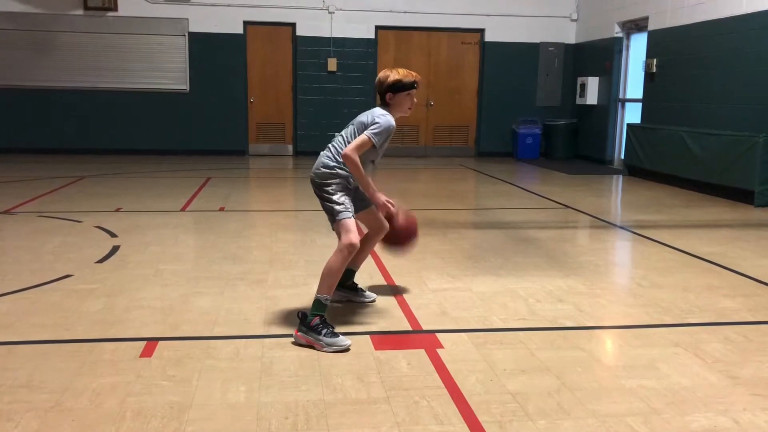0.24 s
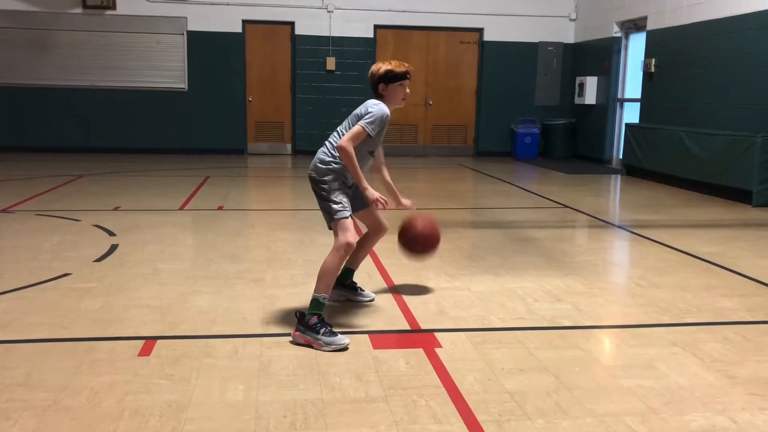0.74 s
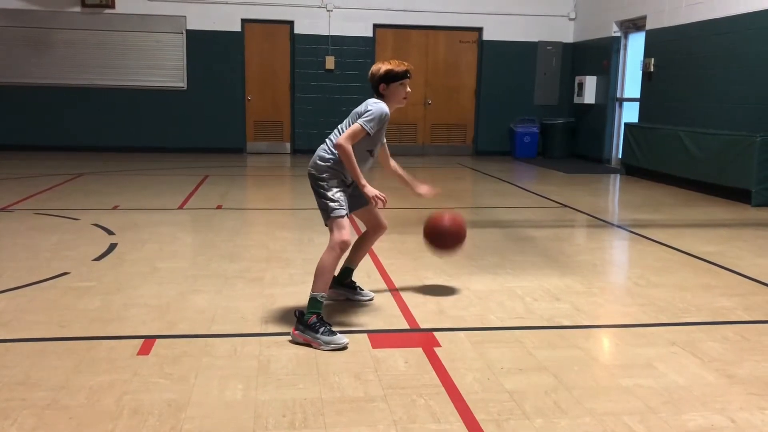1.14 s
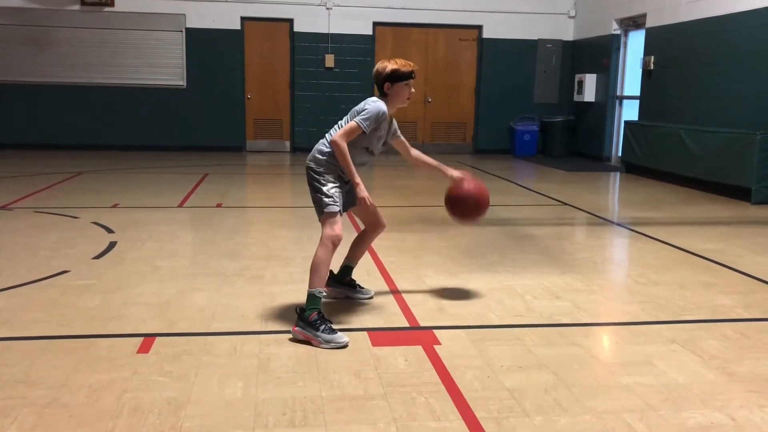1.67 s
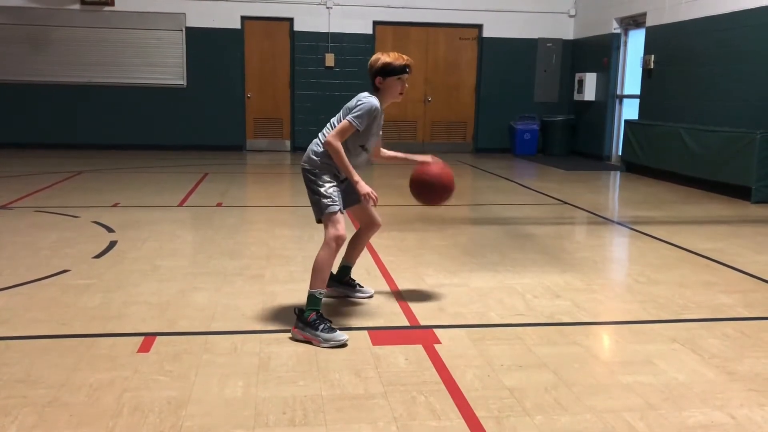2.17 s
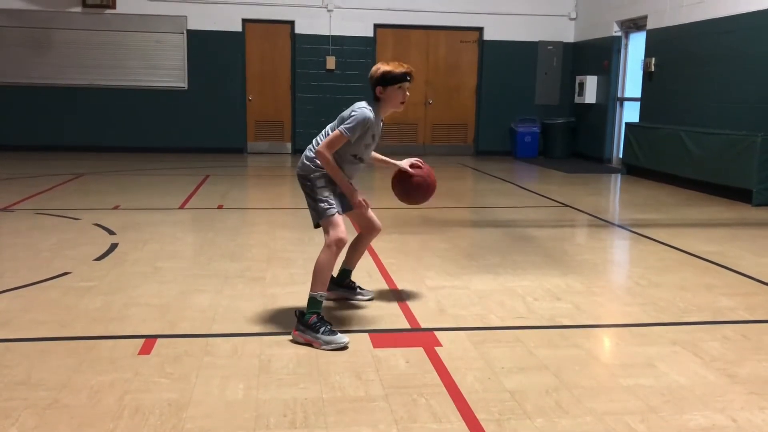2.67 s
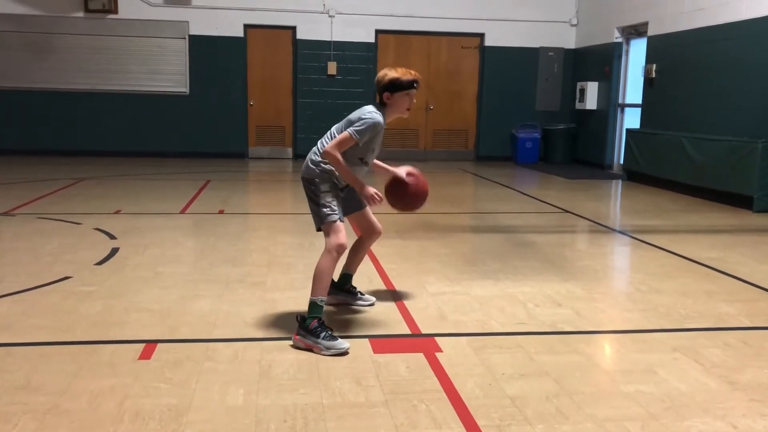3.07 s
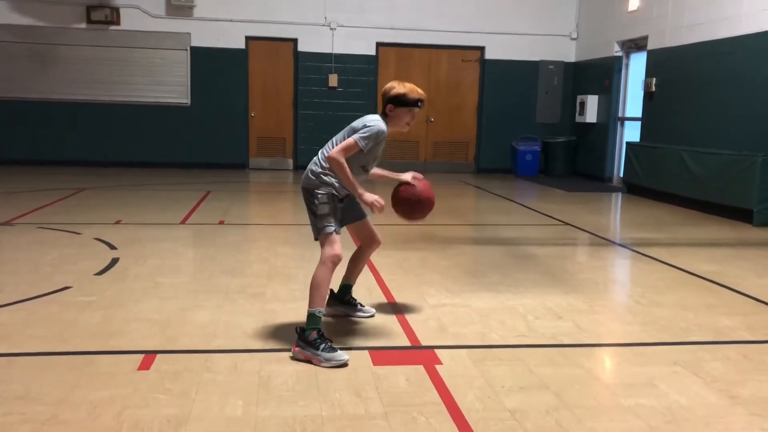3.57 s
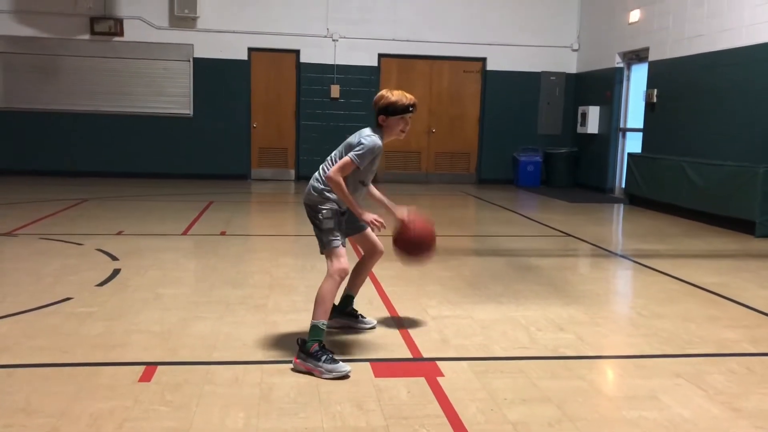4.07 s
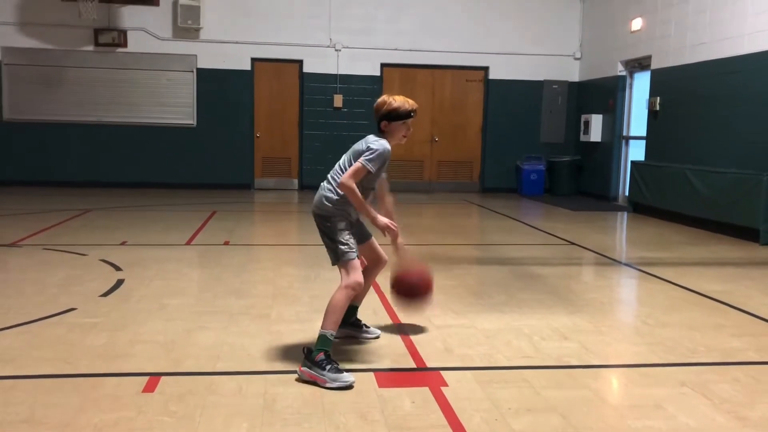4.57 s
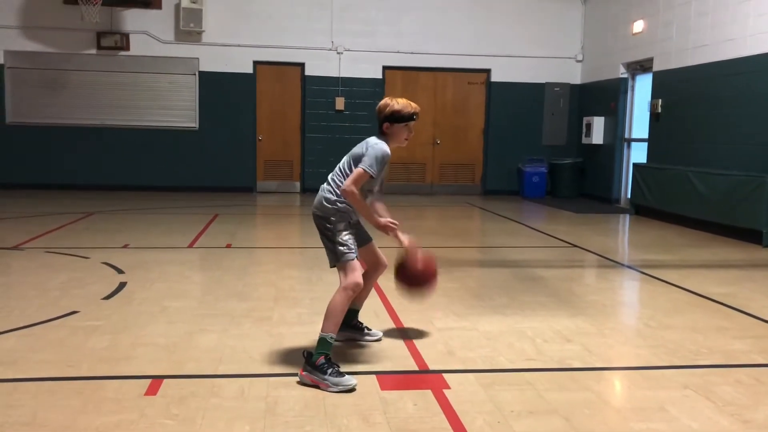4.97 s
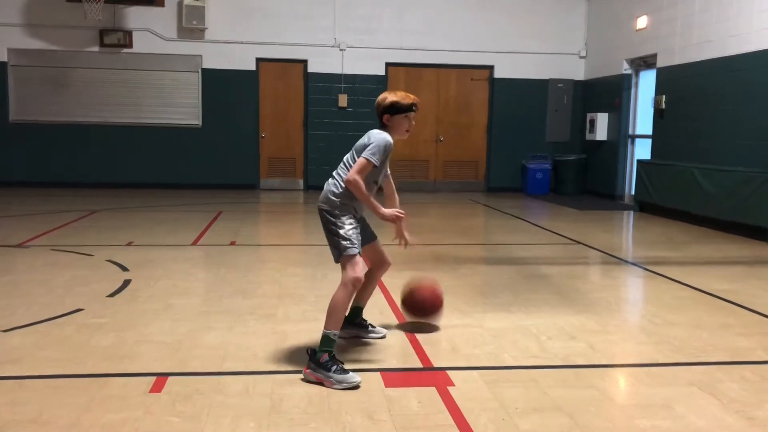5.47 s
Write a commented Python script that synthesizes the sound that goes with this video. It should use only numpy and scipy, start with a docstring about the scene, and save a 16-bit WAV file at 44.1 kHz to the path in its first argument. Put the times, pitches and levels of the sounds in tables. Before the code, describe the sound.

A basketball is dribbled steadily on a hard floor, its sharp bounces echoing through a gym over a faint hum.

```python
"""A gym is ringing with a basketball dribble already under way, over a faint ventilation hum.
Each impact on the hard floor, a few metres off, gives a sharp slap of the skin, a knock of the shell,
a ping of the enclosed air, a brief shudder of the floor and a low thump and boom of the whole ball.
Ceiling and walls return these as distinct echoes and a long diffuse reverberation."""
import sys
import numpy as np
from scipy import signal
from scipy.fft import rfft, irfft
from scipy.io import wavfile

SR = 44100
rng = np.random.default_rng(int(sys.argv[2]) if len(sys.argv) > 2 else 0)


def int16_out(signal):
    """Quantize to a 16-bit WAV file."""
    q = np.round(np.clip(np.atleast_2d(signal).T, -1, 1) * 32767)
    wavfile.write(sys.argv[1], SR, q.astype(np.int16))


N = 251811
LEAD_S, RING_S = 1, 2  # room for bounces before time zero; length of the hall's response


def undb(db):
    """A level in decibels is a logarithmic amplitude ratio; return the ratio."""
    return 10 ** (np.asarray(db) / 20)


def curve(points, hz):
    """Interpolate (frequency [Hz], value) points on a logarithmic frequency axis."""
    f, v = np.transpose(points)
    return np.interp(np.log(np.maximum(hz, 1)), np.log(f), v)


def add(track, sound, s):
    """Superposition: a sound sums into a track from time s on."""
    i = max(int(round(s * SR)), 0)
    part = sound[:max(len(track) - i, 0)]
    track[i:i + len(part)] += part


def noise(spectrum, count):
    """Spectral shaping: white noise is weighted frequency by frequency."""
    gain = undb(curve(spectrum, np.fft.rfftfreq(count, 1 / SR)))
    return irfft(rfft(rng.standard_normal(count)) * gain, count)


def reverberation(spectrum, build_s):
    """A diffuse field builds up, then decays by absorption, fastest in the top treble."""
    # reverberation time of the hall: (frequency [Hz], T60 [s])
    hall_t60 = [(60, 2.2), (150, 2), (500, 2.2), (1400, 2.93), (3000, 4.02), (5000, 2.65), (8000, 1.33),
                (12000, .85), (16000, 0.53)]
    t = np.arange(RING_S * SR) / SR
    hz, frame_s, bands = signal.stft(noise(spectrum, len(t)), SR, nperseg=512)
    decay = np.exp(-np.log(1000) * frame_s / curve(hall_t60, hz)[:, None])
    fading = signal.istft(bands * decay, SR)[1][:len(t)]
    return fading * (1 - np.exp(-(t / build_s) ** 2))


def ventilation():
    """Flow noise: moving air makes a faint, steady, low hum."""
    # spectrum of the airflow: (frequency [Hz], level [dB])
    airflow = [(20, -61), (60, -27), (120, -14.5), (300, -34), (1000, -52.5), (4000, -84), (16000, -79)]
    return noise(airflow, N)


def echoes(sound, paths, wander_s=0.):
    """Specular reflection adds delayed copies; the delays wander as the ball moves about."""
    out = np.zeros(RING_S * SR)
    add(out, sound, 0)
    for s, db in paths:
        add(out, undb(db) * sound, s + wander_s * rng.standard_normal())
    return out


def bass_paths(far_s=.232, step_s=.0287, far_db=-4.5, loss_db=3.5):
    """Path length sets delay: near surfaces answer early, the back wall late in an even train."""
    # reflections from large near surfaces: (delay [s], level [dB])
    near = [(0.0053, 3), (0.0153, 1), (0.0376, -2.5), (0.0452, -6.5)]
    return near + [(far_s + k * step_s, far_db - abs(k) * loss_db) for k in range(-2, 3)]


def slap(force_db, crack_db, size=1024):
    """Impact radiates a minimum-phase pulse, brighter the harder the skin lands."""
    # spectrum of the skin striking the floor: (frequency [Hz], level [dB])
    spectrum = [(100, -4), (400, 11.5), (600, 0), (850, 2.5), (1200, 6.5), (2000, 9.5), (2900, 7.5),
                (4500, 11.5), (7000, 3), (9000, 2), (12000, -4.5), (16000, -10)]
    # centres of the slap's body, crack, bite and top: (frequency [Hz])
    centres = [1000, 2500, 4800, 10000]
    body_db, bite_db, top_db = 0.14 + 0.64 * force_db, -3.5 + 1.17 * force_db, -5.5 + 1.4 * force_db
    colour = list(zip(centres, [body_db, crack_db, bite_db, top_db]))
    hz = np.fft.rfftfreq(size, 1 / SR)
    cepstrum = irfft(np.log(undb(curve(spectrum, hz) + curve(colour, hz))))
    # folding the cepstrum gives the shortest causal pulse with this spectrum
    cepstrum[1:size // 2] *= 2
    cepstrum[size // 2 + 1:] = 0
    return irfft(np.exp(rfft(cepstrum)), size)


def skin_contact(tick_s, tick_db=-8, grit_db=-20.5, grit_s=0.0017, dispersion=0.73):
    """Impulsive excitation: the skin hits, its pebbles crackle, and it ticks again as it flattens."""
    t = np.arange(1024) / SR
    contact = undb(grit_db) * rng.standard_normal(len(t)) * np.exp(-t / grit_s)
    contact[0] += 1
    add(contact, np.array([undb(tick_db)]), tick_s)
    # all-pass dispersion: treble runs through the shell a little ahead of the bass
    for _ in range(2):
        contact = signal.lfilter([-dispersion, 1], [1, -dispersion], contact)
    return contact


def knock(low_hz, fall_hz=600, fall_s=0.0012, swell_s=0.0012):
    """A gliding resonance: the shell's pitch drops as the dent widens."""
    t = np.arange(SR // 40) / SR
    hz = low_hz + fall_hz * np.exp(-t / fall_s)
    return np.sin(2 * np.pi * np.cumsum(hz) / SR) * t / swell_s * np.exp(1 - t / swell_s)


def ring(modes, detune=0.):
    """Free vibration is a sum of damped modes; detune is their random relative pitch spread."""
    t = np.arange(SR // 2) / SR
    out = np.zeros(len(t))
    for hz, db, t60 in modes:
        pitch_hz = hz * (1 + detune * rng.standard_normal())
        out += undb(db - 60 * t / t60) * np.sin(2 * np.pi * pitch_hz * t)
    return out


def ping(force_db):
    """Cavity resonance: the enclosed air and the shell ring on, louder after a harder blow."""
    # modes of air and shell: (frequency [Hz], level [dB], T60 [s])
    modes = [(478.4, -36, 0.11), (819, -51, 0.37), (1158, -42, 0.38), (1585, -48.5, 0.37),
             (2080, -50.5, 0.21)]
    return undb(0.14 + 0.64 * force_db) * ring(modes, detune=0.0139)


def impact(force_db, knock_db, crack_db, knock_hz, tick_s, lift_s=0.01, mean_knock_hz=1080):
    """Slap, ping and knock arrive as direct sound and reverberation, the slap also as early echoes."""
    # hard surfaces that mirror the slap: (delay [s], level [dB])
    mirrors = [(.0104, -20), (0.0182, -9), (0.028, -22.5), (0.051, -21), (.0660, -22.5)]
    # diffuse response of the hall to the impact: (frequency [Hz], gain [dB])
    hall_gain = [(200, -86), (480, -38), (720, -35.5), (950, -38), (1200, -40.5), (1550, -39), (2100, -43),
                 (3000, -41.5), (4500, -46.5), (7000, -41.5), (10000, -44.5), (16000, -43)]
    pulse = slap(force_db, crack_db)
    skin = signal.fftconvolve(skin_contact(tick_s), pulse)
    air = ping(force_db)
    # the hall gathers sound from all sides of the ball, by new paths at every bounce
    radiated = air.copy()
    add(radiated, pulse, 0)
    add(radiated, undb(knock_db - 17) * knock((knock_hz + mean_knock_hz) / 2, swell_s=0.00038), tick_s)
    out = undb(-1) * signal.fftconvolve(radiated, reverberation(hall_gain, build_s=0.029))
    add(out, echoes(skin, mirrors, wander_s=0.00014), 0)
    add(out, air, 0)
    add(out, undb(knock_db - 19) * knock(knock_hz), 0)
    add(out, undb(-30) * knock(knock_hz), lift_s)  # the shell springs off the floor
    return out


def shudder(t60=0.23, rise_s=0.00083):
    """Bending waves scatter through the floor and die quickly."""
    # floor vibration round the point of impact: (frequency [Hz], level [dB])
    spectrum = [(120, -47), (250, -13.5), (370, -20), (490, -13), (620, -30.5), (900, -27), (1300, -32),
                (1800, -32.5), (4000, -49)]
    t = np.arange(SR // 3) / SR
    return noise(spectrum, len(t)) * np.exp(-np.log(1000) * t / t60) * (1 - np.exp(-t / rise_s))


def thump():
    """Mass-spring resonance of the whole ball on the floor, with its echoes and diffuse rumble."""
    # lowest modes of the ball against the floor: (frequency [Hz], level [dB], T60 [s])
    modes = [(149.6, -24, 0.13), (114.4, -31.5, 0.2)]
    # reverberant spectrum of the thump: (frequency [Hz], level [dB])
    rumble = [(25, -80), (42, -59), (58, -37.5), (80, -47), (110, -55), (138, -48), (158, 3), (178, -22),
              (250, -20.5), (380, -30.5), (490, -47), (580, -50), (900, -76)]
    return echoes(ring(modes), bass_paths()) + undb(-4) * reverberation(rumble, build_s=0.011)


def boom(echo_db=-9):
    """Higher, heavily damped modes of the squashed ball sound briefly, with weaker echoes."""
    # upper modes of the ball against the floor: (frequency [Hz], level [dB], T60 [s])
    modes = [(230.6, -26, 0.056), (276.6, -38, 0.028)]
    return echoes(ring(modes), [(s, db + echo_db) for s, db in bass_paths()])


def dribble(squash_s=0.00271, tick_ms=0.88, tick_spread_ms=0.27):
    """Repeated elastic collision: impact and shudder at first touch, thump and boom on compression."""
    # bounces, with relative levels; the crack depends on the patch of skin that lands:
    # (time [s], force [dB], boom [dB], knock [dB], crack [dB], final knock pitch [Hz])
    bounces = [ (-.5100, 2, 0, 1.5, -3, 1110), (-.1350, 0, -5, -1.5, -2.5, 1020),
               (.2410, -0.5, 0, 3, -13.5, 1125), (0.6109, -0.3, -1, 5, -10, 964),
               (.9999, 0, 6.5, -.5, -2, 1000), (1.4479, -3, 8.5, 5.5, -3, 1256),
               (1.9074, 0.5, 11.5, 0.5, -1, 890), (2.3880, 1.4, 0, 1.5, 0.5, 980),
               (2.8132, 0.7, -10, 1.5, -5.5, 1040), (3.2414, 0.3, -4, 3, -3, 1190),
               (3.6713, 2, 2.5, 0, -0.5, 1020), (4.0930, 3.5, 1, 3.5, 1, 1110),
               (4.5433, 3, 2.5, 2.5, 0.5, 1190), (4.9635, 1.25, -0.5, 1, -3.5, 1170),
               (5.4000, 2.5, -5, -2, 1.5, 980)]
    # reverberant spectrum of the boom: (frequency [Hz], level [dB])
    boom_spectrum = [(100, -62), (170, -37), (230, -17), (330, -34.5), (600, -42), (2000, -88)]
    out = np.zeros(N + LEAD_S * SR)
    # long waves hardly notice the ball's position, so every bounce shares these two responses
    thump_sound, boom_sound = thump(), boom()
    for s, force_db, boom_db, knock_db, crack_db, knock_hz in bounces:
        tick_s = (tick_ms + tick_spread_ms * rng.uniform(-1.2, 1)) / 1000
        boom_tail = undb(-7) * reverberation(boom_spectrum, build_s=0.0072)
        bass = undb(force_db) * thump_sound + undb(boom_db) * (boom_sound + boom_tail)
        add(out, impact(force_db, knock_db, crack_db, knock_hz, tick_s), LEAD_S + s)
        add(out, undb(force_db) * shudder(), LEAD_S + s)
        add(out, bass, LEAD_S + s + squash_s)
    return out[LEAD_S * SR:]


def scene():
    """The sound pressures of dribble and ventilation superpose in one channel."""
    return (dribble() + ventilation())[None]


def record(dry, low_cut_hz=52, top_hz=16200):
    """Band limiting: the microphone drops the deepest bass and the very top."""
    dry = signal.sosfilt(signal.cheby1(4, .5, low_cut_hz, "high", fs=SR, output="sos"), dry)
    return signal.sosfilt(signal.ellip(10, .2, 90, top_hz, fs=SR, output="sos"), dry)


dry = scene()
out = record(dry)
int16_out(out)
```